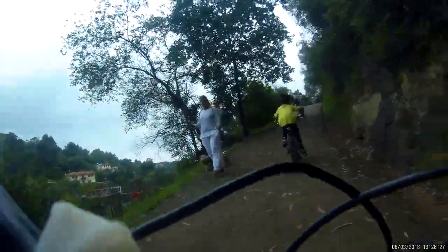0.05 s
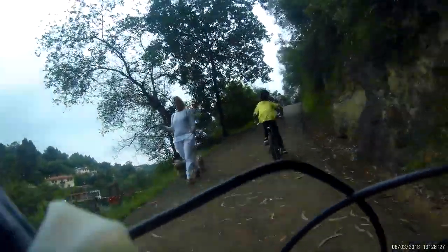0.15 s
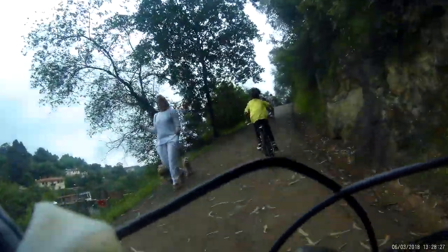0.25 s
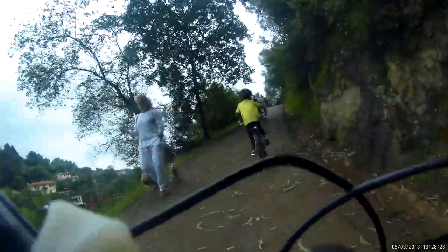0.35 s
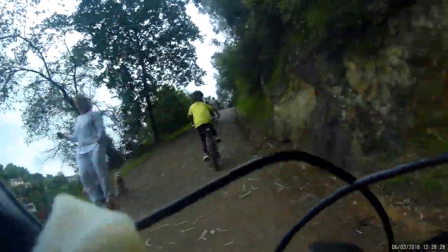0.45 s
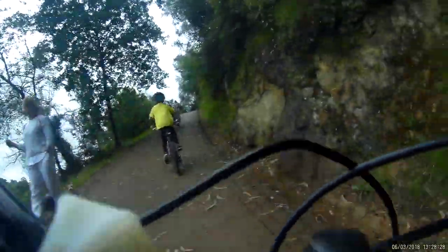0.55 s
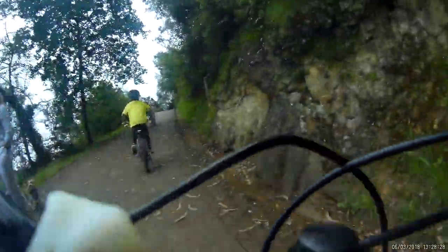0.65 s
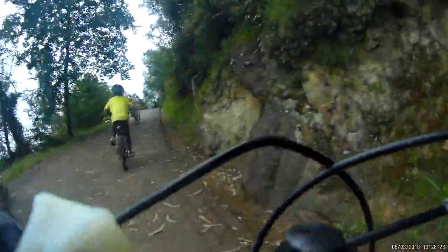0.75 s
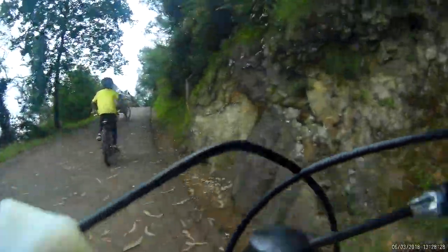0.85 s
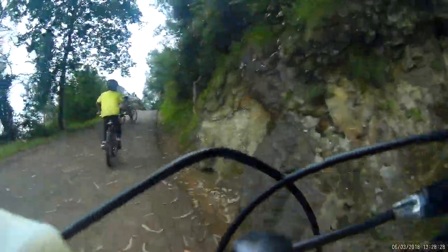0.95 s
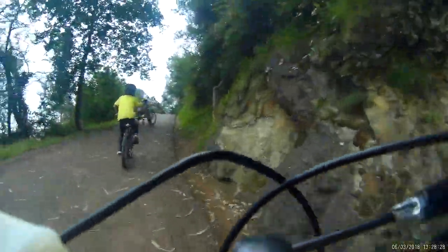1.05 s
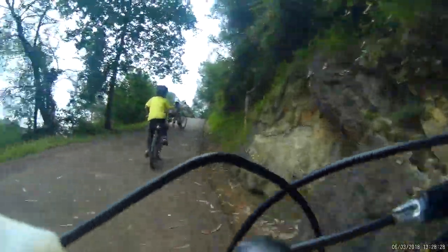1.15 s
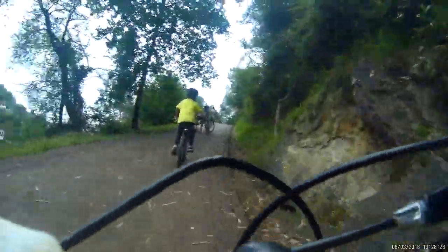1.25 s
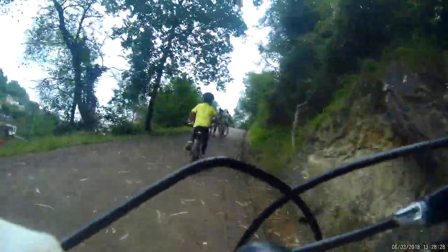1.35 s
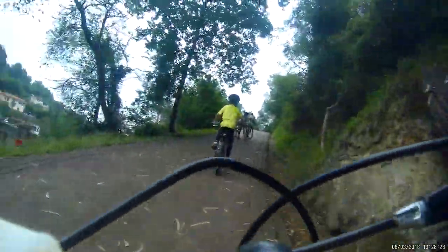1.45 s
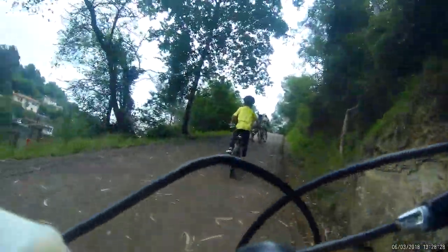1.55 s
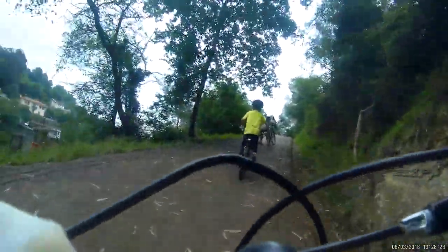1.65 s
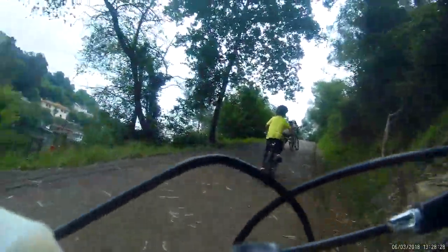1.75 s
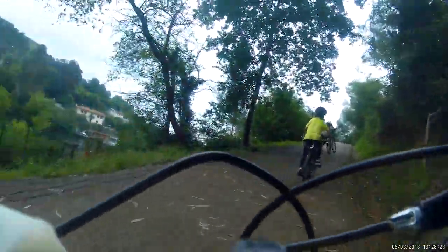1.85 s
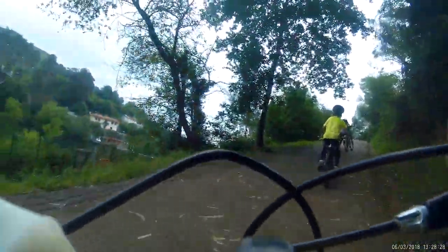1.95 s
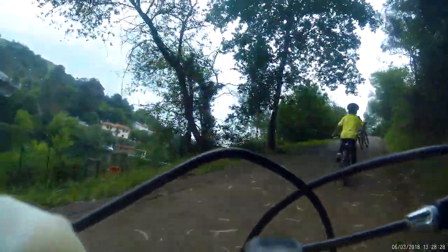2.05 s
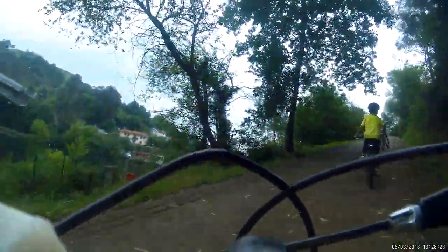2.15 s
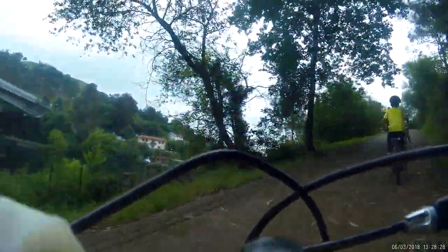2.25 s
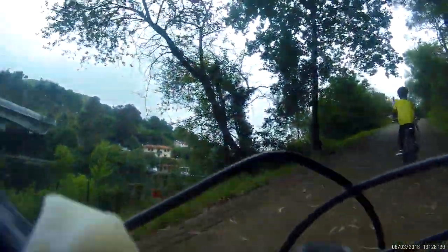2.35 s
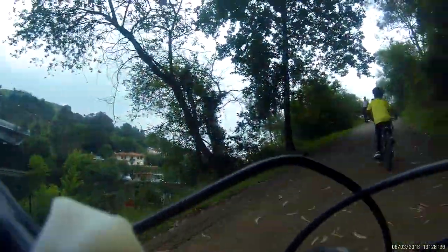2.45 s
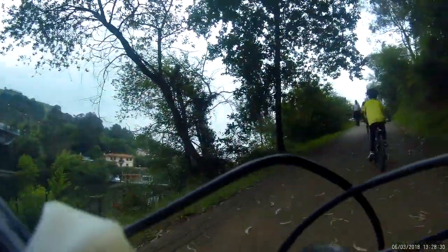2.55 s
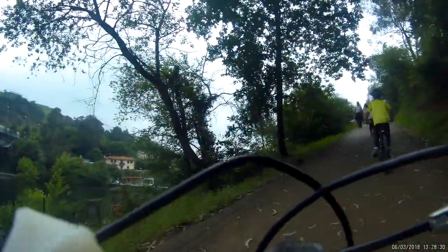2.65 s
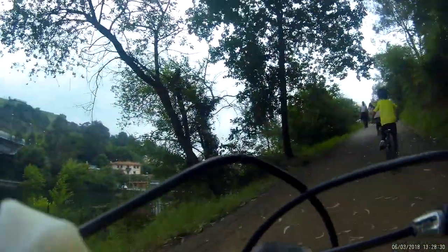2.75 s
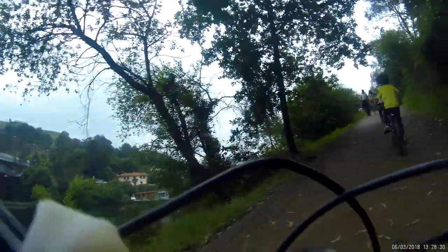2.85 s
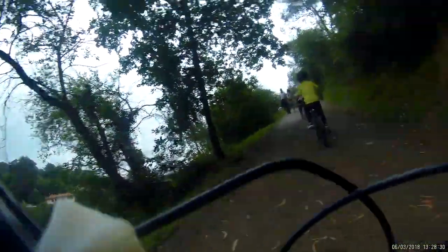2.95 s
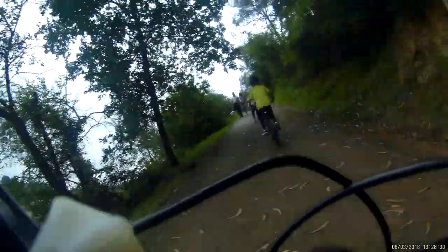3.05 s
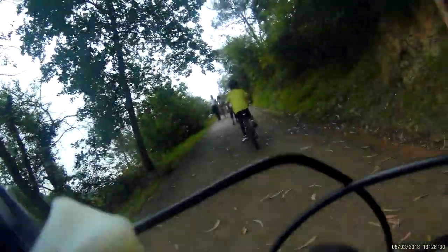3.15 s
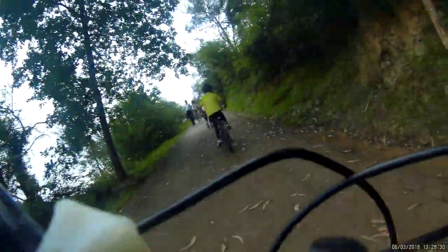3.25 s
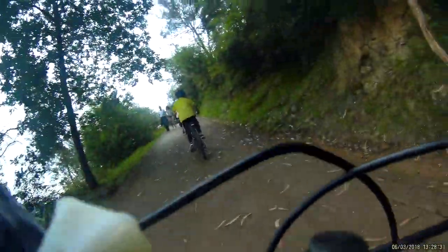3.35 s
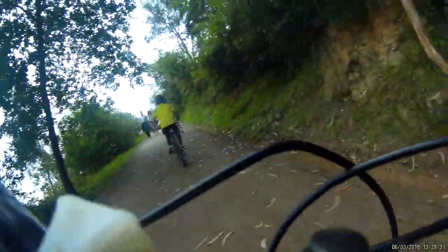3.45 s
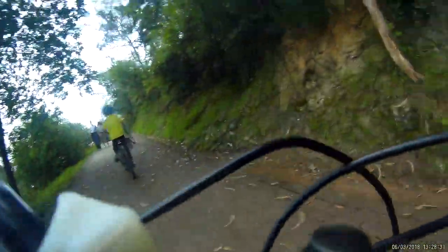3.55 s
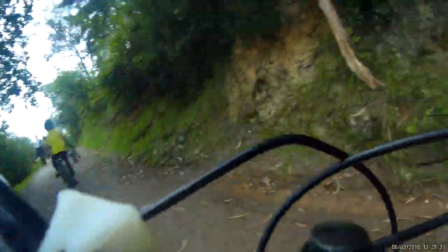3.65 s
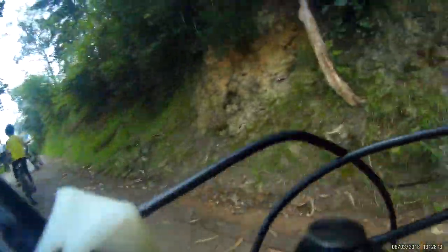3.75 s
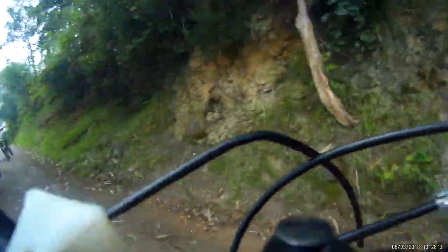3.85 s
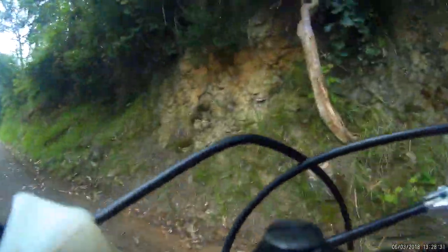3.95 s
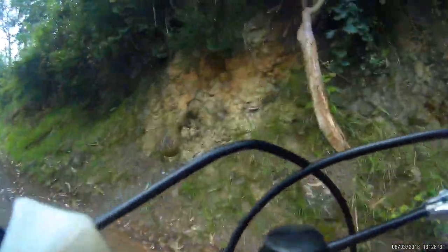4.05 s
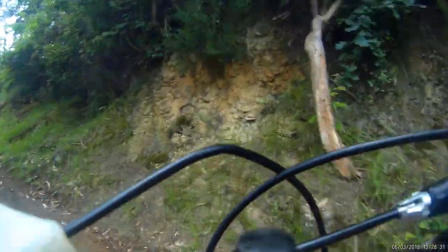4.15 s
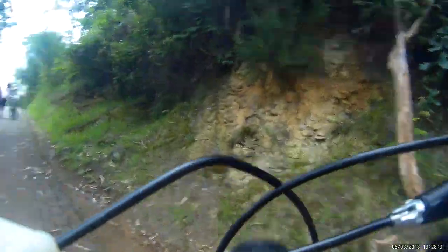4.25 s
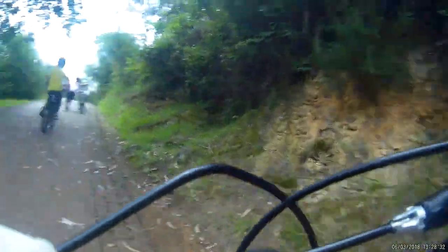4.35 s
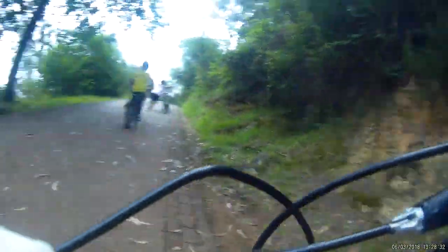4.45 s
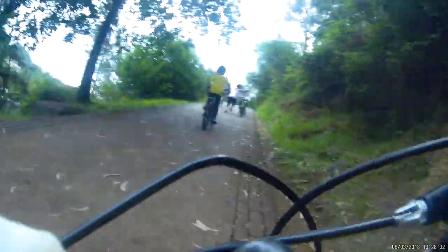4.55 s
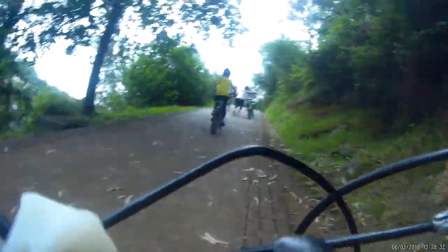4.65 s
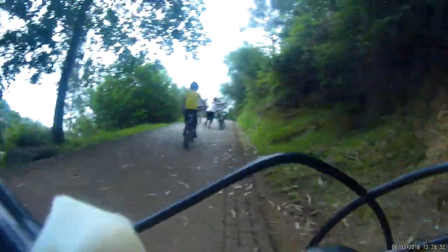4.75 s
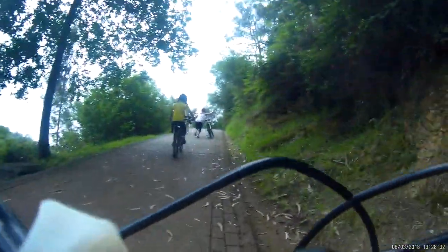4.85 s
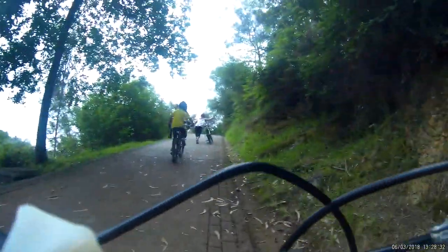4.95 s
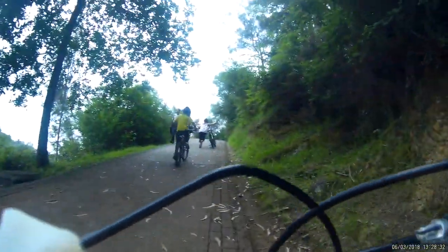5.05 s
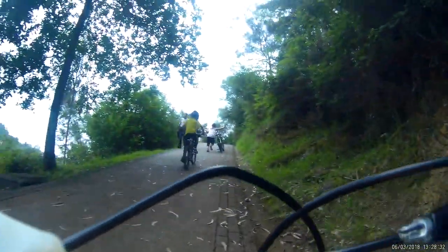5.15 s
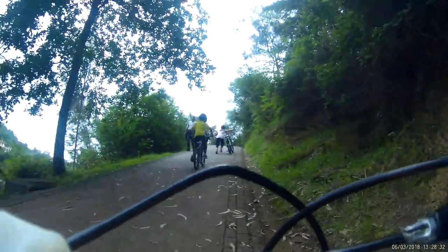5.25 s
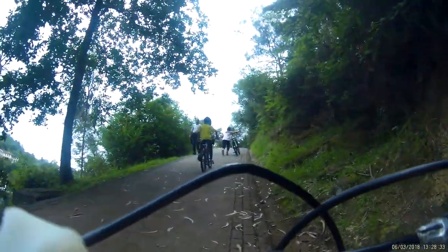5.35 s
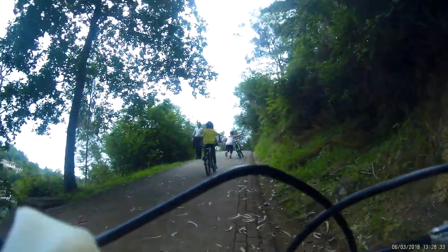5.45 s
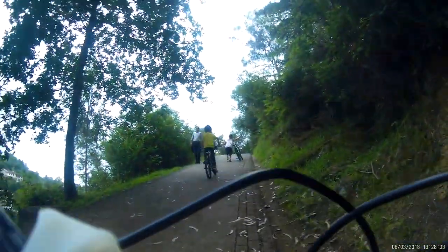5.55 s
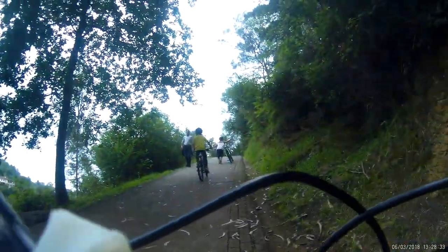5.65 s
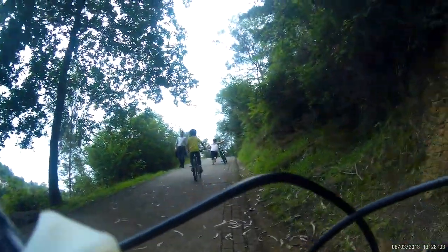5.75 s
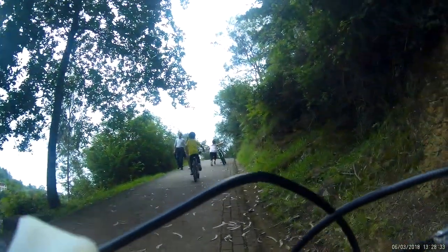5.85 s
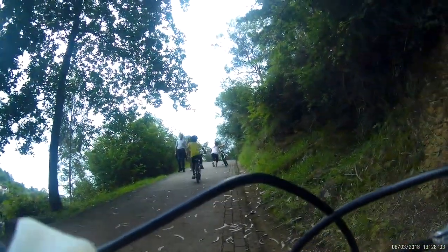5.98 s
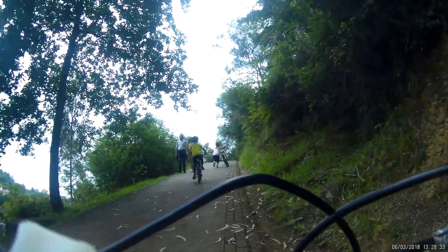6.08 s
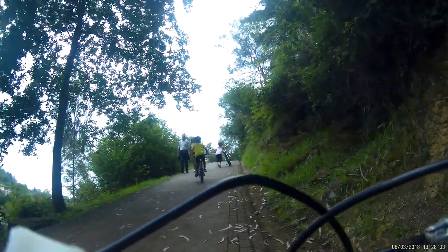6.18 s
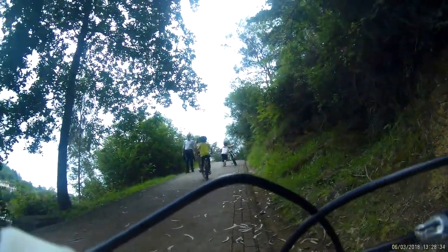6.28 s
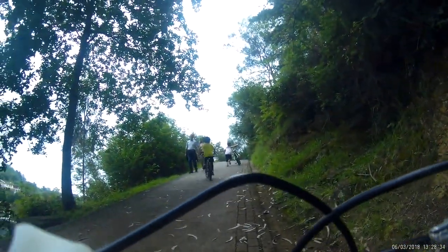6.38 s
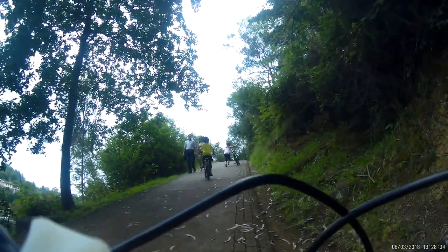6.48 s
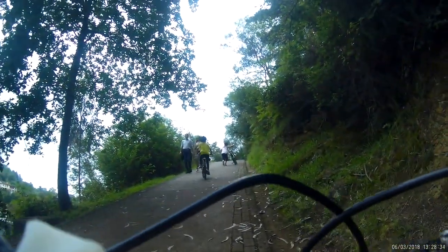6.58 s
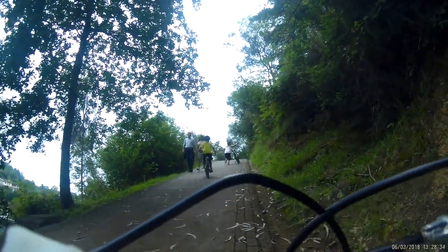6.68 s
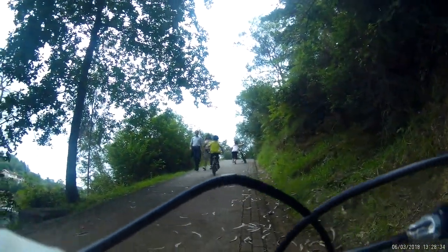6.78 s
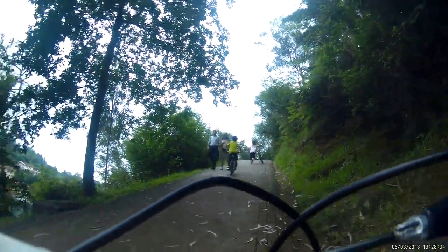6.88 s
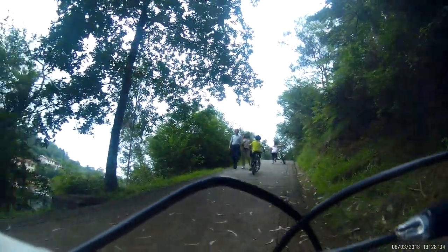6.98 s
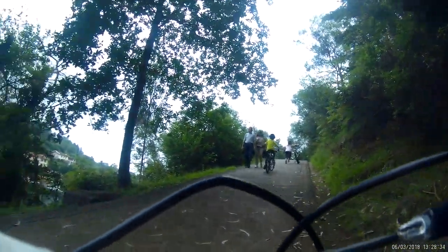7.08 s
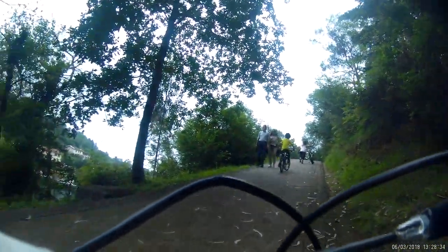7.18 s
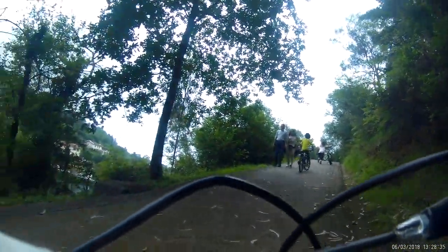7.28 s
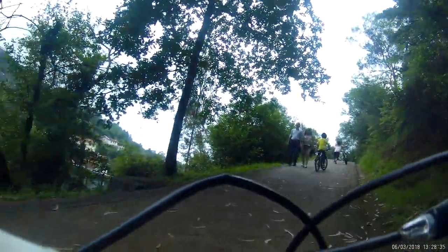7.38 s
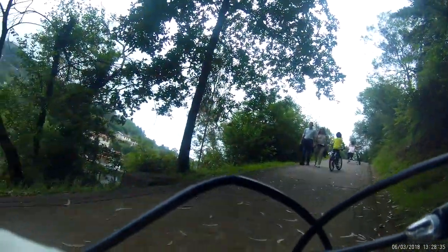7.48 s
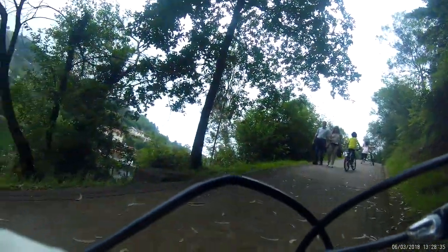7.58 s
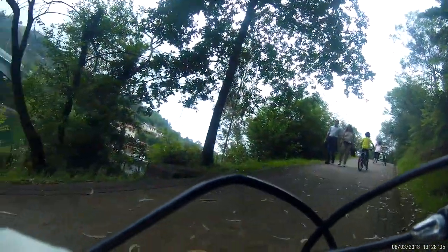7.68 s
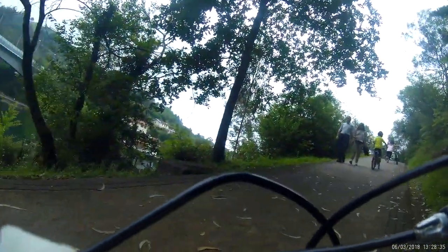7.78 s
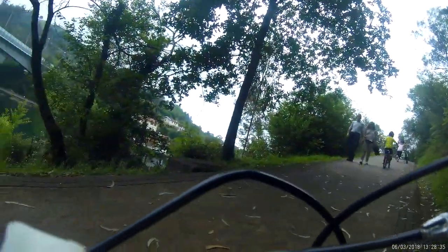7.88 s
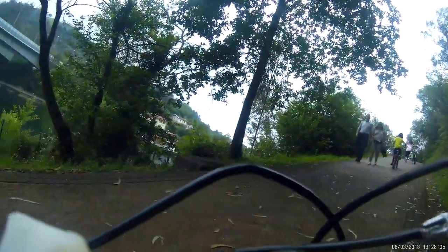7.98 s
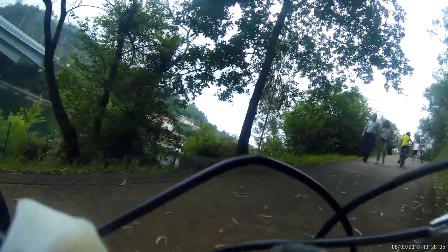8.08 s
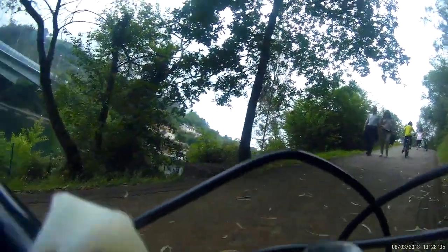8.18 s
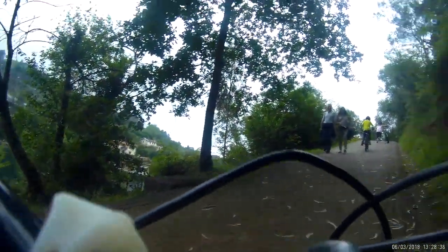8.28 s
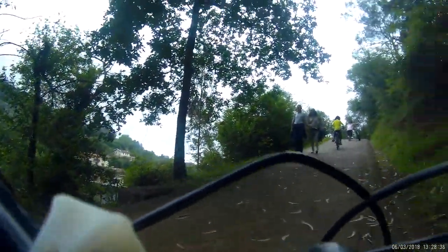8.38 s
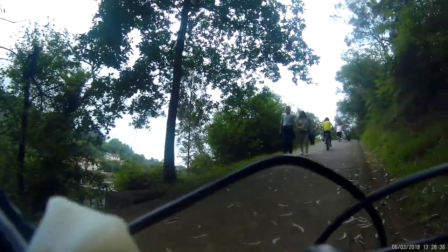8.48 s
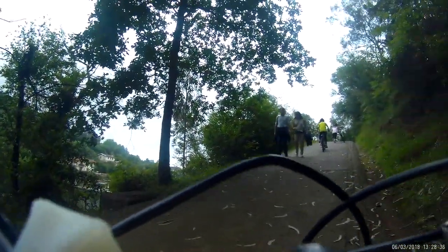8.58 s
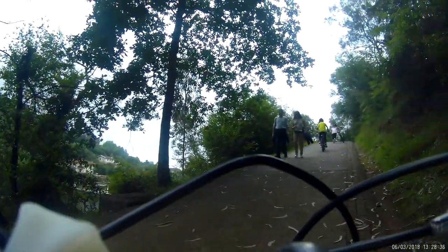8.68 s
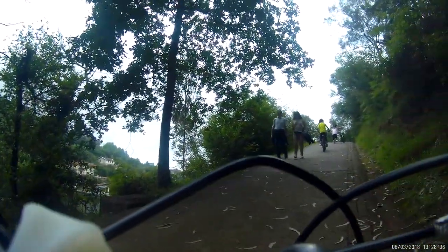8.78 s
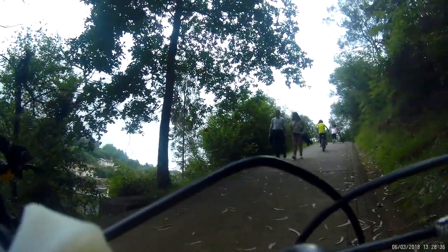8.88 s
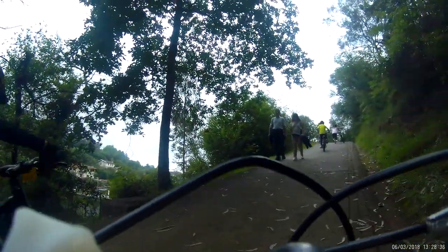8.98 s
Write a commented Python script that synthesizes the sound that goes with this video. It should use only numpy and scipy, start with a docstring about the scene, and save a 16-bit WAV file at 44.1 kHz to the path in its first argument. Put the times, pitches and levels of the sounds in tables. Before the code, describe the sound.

Heard through the handlebar the microphone is fixed to, a bicycle shakes along a bumpy path with a deep, uneven rumble, rattling parts and a ticking cable. The shaking eases, and after one short brake squeak it dies away. A single sharp knock on the bar, the loudest sound, breaks the lull. Afterwards only soft hiss, scattered small clicks and a faint ticking of the freewheel remain.

```python
"""On a rough path, microphone clamped to the handlebar of a bicycle that rolls, slows and stops.
Everything is close and arrives through the bar, over a soft hiss. The clamp bounces near 75 Hz,
tyre grit shakes the frame modes, loose parts knock and a cable ticks on its housing. The brake
squeaks once; after the stop one hard blow lands on the bar and the freewheel ticks faintly."""
import sys
import numpy as np
from scipy import signal
from scipy.fft import rfft, irfft
from scipy.io import wavfile

SR = 44100
rng = np.random.default_rng(int(sys.argv[2]) if len(sys.argv) > 2 else 0)


def pcm_store(signal):
    """Save signal as 16-bit PCM."""
    levels = np.round(np.clip(np.atleast_2d(signal), -1, 1) * 32767)
    wavfile.write(sys.argv[1], SR, levels.astype(np.int16).T)


N = 397782

# the hard blow on the bar: (time [s], level [dB])
BLOW = [(6.5555, -2.5)]
BLOW_S, BLOW_DB = BLOW[0]
# bumps in the path: (time halfway up the swell [s], level [dB], bar bending relative to it [dB])
BUMPS = [(0.046, -30.5, -22), (0.174, -13.5, -19), (0.327, -15, -19.5), (0.567, -13, -26),
         (0.749, -11, -26), (0.949, -9.5, -24), (1.06, -12, -17.5), (1.151, -11.5, -24),
         (1.239, -15, -14.5), (1.432, -10.5, -19), (1.56, -11.5, -20), (1.769, -15, -27), (1.87, -17, -27),
         (2.008, -19, -23), (2.098, -17.5, -8), (2.291, -18.5, -14), (2.414, -17, -28), (2.494, -13, -31),
         (2.671, -16.5, -24), (2.809, -20.5, -14), (2.898, -18.5, -20), (3.125, -16, -37),
         (3.229, -12.5, -29), (3.399, -16, -25), (3.584, -15.5, -41), (3.762, -17.5, -32),
         (3.878, -17, -22), (4.067, -20.5, -34), (4.181, -22.5, -21.5), (4.261, -21, -22),
         (4.355, -22, -20.5), (4.498, -23, -4), (4.578, -19.5, -10), (4.888, -35, -15), (5.085, -26, -18),
         (5.18, -26.5, -19), (5.459, -38, -7), (5.547, -34, -7), (5.699, -45.5, -23), (5.967, -58, -18),
         (6.329, -58.5, -4), (6.926, -43.5, -16), (7.099, -47.5, -13), (7.431, -40, -13), (7.619, -48, -11),
         (7.909, -55, -7), (8.254, -49, -10), (8.34, -35.5, -9.5), (8.506, -35.5, -28), (8.699, -43, -13.5),
         (8.989, -41, -13)]
# modes that rubbing sounds in the frame: (frequency [Hz], level [dB])
RUB_MODES = [(2000, -3), (3250, 1), (4100, -5)]
FULL_SHAKE_DB = -38   # shaking at cruising speed
AFTERSHOCK_DB, AFTERSHOCK_T60_S = -54, .7   # the blow shakes the frame too


def from_db(db):
    """Decibels to amplitude."""
    return 10 ** (np.asarray(db) / 20)


def rms_one(x):
    """Scale to an rms of 1."""
    return x / np.sqrt(np.mean(x ** 2) + 1e-20)


def filtered(x, order, hz, kind="band"):
    """Butterworth filter."""
    return signal.sosfilt(signal.butter(order, hz, kind, fs=SR, output="sos"), x)


def in_time(rows):
    """A (time, value) curve, one value per sample."""
    return np.interp(np.arange(N) / SR, *np.transpose(rows))


def drift(rate):
    """Slow random wander with spread 1."""
    r = np.exp(-80 * np.pi * rate / SR)
    slow = signal.lfilter([1], [1, -2 * r, r * r], rng.standard_normal(N // 40 + 2002))[2000:]
    return np.interp(np.arange(N) / 40, np.arange(len(slow)), rms_one(slow - slow.mean()))


def ring(clicks, hz, t60):
    """One mode: a unit click starts a dying sine of height 1."""
    r, w = from_db(-60 / (t60 * SR)), 2 * np.pi * hz / SR
    return signal.lfilter([0, np.sin(w)], [1, -2 * r * np.cos(w), r * r], clicks + 1e-18)


def clicks_at(s, sizes):
    """One impulse per event."""
    out = np.zeros(N)
    np.add.at(out, np.round(np.asarray(s) * SR).astype(int), sizes)
    return out


def puffs(s, level_db, t60, rise_s=0.00014):
    """Noise bursts that swell quickly and die away."""
    out = np.zeros(N)
    for start, db, length in zip(s, level_db, np.broadcast_to(t60, len(s))):
        t = np.arange(int(length * SR)) / SR
        i = round(start * SR)
        envelope = from_db(db - 60 * t / length) * (1 - np.exp(-t / rise_s))
        out[i:i + len(t)] += envelope[:N - i]
    return out * rng.choice([-1, 1], N)


def swells(s, peak_db, rise_s=.035, t60=.5):
    """Envelope of bumps: each swells briefly and dies away; the strongest one rules."""
    t, out = np.arange(SR) / SR, np.zeros(N + SR)
    shape = np.minimum(t / rise_s, 1) * from_db(-60 * np.maximum(t - rise_s, 0) / t60)
    for start, db in zip(s, peak_db):
        i = round((start - rise_s / 2) * SR)
        out[i:i + SR] = np.maximum(out[i:i + SR], from_db(db) * shape)
    return out[:N]


def shaking(shudder_db=-200):
    """Shaking of the frame in dB against full shake; the blow can add a dying shudder."""
    # how hard the path shakes the frame: (time [s], level [dB])
    path_shake = [(0.0, -36.5), (0.43, -34), (0.93, -37.5), (1.4, -35.5), (1.9, -38.5), (3.16, -40.5),
                  (3.6, -37.5), (4.1, -45.5), (4.55, -40.5), (4.9, -48.5), (5.24, -52.5), (5.37, -66.5),
                  (5.6, -59), (5.88, -73.5), (6.3, -73.5), (7.08, -67), (8.2, -72), (8.54, -59),
                  (8.85, -71.5), (9.02, -73.5)]
    since = np.arange(N) / SR - BLOW_S
    shudder = (since > 0) * from_db(shudder_db - 60 * np.abs(since) / AFTERSHOCK_T60_S)
    return 20 * np.log10(from_db(in_time(path_shake)) + shudder) - FULL_SHAKE_DB


def follows(shake_db, full_db, slope):
    """Gain of a layer: full_db at full shake, moving by slope dB per dB of shaking."""
    return from_db(full_db + slope * shake_db)


def strays(per_s, top_db):
    """Times and levels of weak chance touches, rarer and weaker as the shaking dies."""
    when, chance, softness = rng.random((round(N / SR * per_s), 3)).T
    shake_db = shaking()[(when * N).astype(int)]
    kept = chance < from_db(shake_db)
    return (when * N / SR)[kept], (top_db + shake_db - 7.1 * softness)[kept]


def hiss():
    """A soft bed of hiss that rises and falls with the shaking."""
    # colour of the hiss: (frequency [Hz], spectral level [dB])
    spectrum = [(150, -27.5), (300, -1), (1000, -4.5), (2000, -5), (4000, -6.5), (10000, -7.5), (15600, -7),
                (16000, -35)]
    # loudness of the hiss: (shaking [dB], level [dB])
    hiss_law = [(-76.5, -72.5), (-65.5, -65), (-54, -60.5), (-33, -59)]
    level_db = np.interp(shaking(AFTERSHOCK_DB) + FULL_SHAKE_DB, *np.transpose(hiss_law))
    level = from_db(level_db + .8 * drift(12))
    hz = np.maximum(np.fft.rfftfreq(N, 1 / SR), 1)
    point_hz, point_db = np.transpose(spectrum)
    colour = from_db(np.interp(np.log(hz), np.log(point_hz), point_db))
    return level * rms_one(irfft(rfft(rng.standard_normal(N)) * colour, N))


def freewheel(start_s=7.625, gap_s=0.039, count=6):
    """The pawl ticks faintly into the two lower rubbing modes as the wheel creeps."""
    clicks = clicks_at(start_s + gap_s * np.arange(count), from_db(-64 + rng.normal(0, 2.0, count)))
    return sum(from_db(db) * ring(clicks, hz, .035) for hz, db in RUB_MODES[:2])


def rubbing():
    """Something slides along the frame just before the blow and faintly sounds three high modes."""
    # strength of the slide: (time [s], level [dB])
    slide = [(6.33, -87), (6.37, -74), (6.45, -75.5), (6.55, -67.5)]
    t = np.arange(N) / SR
    modes = sum(from_db(db) * rms_one(ring(rng.standard_normal(N), hz, .045)) for hz, db in RUB_MODES)
    sliding = (t > slide[0][0]) & (t < slide[-1][0])
    return sliding * from_db(in_time(slide)) * modes


def brake_squeak(start_s=5.085, length_s=0.13, edge_s=0.027):
    """Pad grips the rim: a whistle that bends up and back over a rough rubbing in two low modes."""
    whistle_hz, bend_hz, whistle_db, rub_db = 1140, 417, -40, -38.5
    t = np.arange(N) / SR - start_s
    inside_s = np.minimum(t, length_s - t)
    grip = np.clip(inside_s / edge_s, 0, 1)
    pressed = np.clip(inside_s / edge_s + 1, 0, 1)   # rubbing starts before the whistle and outlasts it
    arch = np.abs(np.sin(np.pi * np.clip(t / length_s, 0, 1))) ** 0.416
    hz = whistle_hz + bend_hz * arch + 15 * drift(84)
    whistle = np.sqrt(2) * np.sin(2 * np.pi * np.cumsum(hz) / SR)
    rub = rms_one(sum(ring(rng.standard_normal(N), mode_hz, 0.042) for mode_hz in (410, 760)))
    return grip * from_db(whistle_db + 3.5 * drift(59)) * whistle + pressed * from_db(rub_db) * rub


def cable_ticks(knocks):
    """The cable scuffs its housing and excites small bright resonances; knocks jog it as well."""
    # cable ticks: (time [s], level [dB])
    ticks = [(0.029, -21.5), (0.2017, -21.5), (0.2114, -14.5), (0.2538, -26), (0.286, -25.5), (0.3378, -22),
             (0.3424, -17.5), (0.345, -20), (0.4425, -26), (0.4528, -12.5), (0.4763, -19.5), (0.481, -22),
             (0.5277, -24.5), (0.5626, -31.5), (0.5754, -38), (0.5882, -35), (0.603, -35), (0.7778, -35),
             (0.7858, -22.5), (0.7898, -22), (0.799, -25.5), (0.8686, -29.5), (0.9108, -25.5),
             (0.9892, -34), (1.0045, -18), (1.013, -20.5), (1.0744, -16), (1.2228, -31), (1.425, -24.5),
             (1.5688, -27.5), (2.3146, -29), (2.4575, -22.5), (2.6219, -29), (2.7122, -21.5), (2.8745, -28),
             (2.8853, -26), (2.9325, -22), (2.9463, -25), (3.0374, -20), (3.1865, -20.5), (3.405, -25),
             (3.4112, -28), (3.5533, -30), (3.6082, -33), (3.65, -25), (3.6563, -32), (3.6623, -38),
             (3.7131, -31), (3.7891, -21), (4.439, -30), (4.4593, -32.5), (4.4877, -38), (6.5567, -17),
             (6.5634, -16.5), (6.57, -20.5), (8.1324, -43)]
    # resonances of the housing: (frequency [Hz], width [Hz], level [dB])
    housing = [(8980, 1200, -4), (10130, 900, 2), (12600, 3000, 1.5), (15100, 2000, 1.5)]
    s, level_db = np.transpose(ticks)
    stray_s, stray_db = strays(per_s=6.0, top_db=-38.5)
    rebound_s = s + 0.011 * rng.uniform(0.6, 1.2, len(s))   # each tick falls back once
    s = np.concatenate([s, rebound_s, knocks[0], stray_s])
    level_db = np.concatenate([level_db, level_db - 18.5, knocks[1] - 28, stray_db])
    scuff = puffs(s, level_db + 8.0, t60=.0045, rise_s=0.0024) + puffs(s, level_db - 30, t60=.04)
    ringing = sum(from_db(db - 4) * ring(scuff, hz, np.log(1000) / (np.pi * width))
                  for hz, width, db in housing)
    return filtered(1.3 * scuff + ringing, 3, [6900, 15000])


def run_of(row, count, uneven):
    """Knock rows for a run of touches; uneven scatters their times and levels."""
    first, gap, db, gain_db, *colour = row
    scatter = uneven * rng.uniform(-1.1, 1, (count, 2))
    return [(first + gap * (k + 0.27 * late), db + gain_db * k + 5.3 * louder, *colour)
            for k, (late, louder) in enumerate(scatter)]


def loose_parts():
    """Columns of all knocks on the frame: single ones, a rattle, a ratchet and weak strays."""
    # single knocks: (time [s], level [dB], weight [dB], brightness [dB])
    singles = [(0.0628, -25.5, -14, -13), (0.176, -25, -12, -15.5), (0.2316, -28, -9, -18),
               (0.5285, -18, -32, -16), (0.541, -26, -19, -11), (0.573, -17.5, -27, -14.5),
               (0.804, -25, -19, -17), (0.8354, -24, -26, -15), (0.854, -22.5, -20, -14),
               (1.3936, -17, -21, -13), (1.4195, -14, -33, -13.5), (1.8092, -26, -9, -17),
               (2.393, -25, -3.5, -21), (2.4449, -28, -11, -15.5), (2.9375, -20.5, -32, -14),
               (3.3781, -34, 7, -15), (3.5159, -31.5, -8, -5), (3.5347, -18, -12.5, -20),
               (3.5533, -14, -11, -11.5), (3.584, -15.5, -30, -18), (3.5912, -26, -7, -13),
               (3.6096, -17, -14, -14), (3.6247, -20.5, -14, -14), (3.6478, -22, -11, -12),
               (3.714, -18.5, -22, -13.5), (4.2697, -11.5, -20, -15), (4.4405, -13.5, -24, -13.5),
               (4.4602, -13, -10, -15.5), (4.4879, -13, -13, -14.5), (4.5218, -28, -3, -17),
               (4.602, -26.5, -18, -37), (4.61, -20, -21, -27), (4.618, -28.5, -15, -27),
               (4.6353, -16.5, -13.5, -35), (4.812, -31, 0, -29), (5.0028, -33.5, -24, -30),
               (5.013, -30.5, 1.5, -29), (5.563, -47, 6, -15), (5.5777, -45.5, 8.5, -9),
               (5.778, -41, 1, -32), (5.7908, -49.5, 11, -26), (6.1734, -58, -1, -17),
               (6.2671, -53.5, 0.5, -24), (6.328, -55.5, 8, -18), (6.419, -51, -2.5, -24),
               (6.8613, -49, -14, -24), (7.2948, -23, -18, -30), (7.3852, -25, -20, -32),
               (7.8987, -23.5, -15, -30), (8.2899, -45.5, -2.5, -20), (8.4984, -48.5, 4, -17),
               (8.6639, -44.5, -2, -20)]
    # fast rattle: (start [s], gap [s], level [dB], gain per touch [dB], weight [dB], brightness [dB])
    rattle = (2.831, .009, -22.5, -.3, -13.5, -15.5)
    # ratchet, each click louder: columns as for the rattle
    ratchet = (6.8952, .0338, -36, 3, -18.5, -32)
    weak = [(s, db, -8, -17) for s, db in zip(*strays(per_s=3.0, top_db=-32.5))]
    runs = run_of(rattle, count=8, uneven=1) + run_of(ratchet, count=4, uneven=0)
    return np.transpose(singles + runs + weak)


def contact_noise(knocks):
    """A scraping burst on every knock; on the blow a crack, a tail and a dull rumble."""
    s, level_db, _, bright_db = knocks
    scrape = filtered(puffs(s, level_db + 0.5, t60=.045), 3, [800, 1650])
    snap = filtered(puffs(s, level_db + bright_db + 8.0, t60=.025), 2, [1600, 2700])
    crack = puffs([BLOW_S, BLOW_S], [BLOW_DB - 10, BLOW_DB - 28], t60=[.02, .07])
    rumble = filtered(puffs([BLOW_S], [BLOW_DB - 14], t60=.19), 3, [200, 1500])
    return scrape + snap + rumble + filtered(crack, 1, 12000, "low")


def blow_ring():
    """Parts that only the blow sets ringing for long."""
    # lingering modes: (frequency [Hz], level [dB], t60 [s])
    modes = [(145, -10, .17), (296, -36, .8), (474, -33, .33), (813, -26, .14), (1030, -38, .45),
             (1346, -28, .2), (4050, -36, .3), (4135, -32, .2)]
    return sum(ring(clicks_at([BLOW_S], from_db(BLOW_DB + db)), hz, t60) for hz, db, t60 in modes)


def grit(per_s, spread_db):
    """Stones under the tyre: random clicks, a few much stronger, coming in clumps."""
    sizes = from_db(spread_db * np.minimum(rng.exponential(1, N), 5)) * rng.choice([-1, 1], N)
    return sizes * (rng.random(N) < per_s * from_db(4.0 * drift(20)) / SR)


def frame(knocks):
    """Path, knocks and the blow all ring the same frame modes, each with strengths of its own."""
    # frame modes: (frequency [Hz], t60 when struck [s], path gain [dB], knock gain [dB], blow gain [dB])
    modes = [(230, .05, -15, -23.5, -17.5), (310.6, 0.15, -3, -29.5, -22), (368.9, .1, 5.5, -11.5, -5.5),
             (493, 0.037, -8.5, -4, -2), (598, 0.024, -6.5, 3, -6), (748, 0.068, -1.5, 2, -18.5),
             (962, 0.049, -3.5, -23.5, -19), (1180, 0.035, -3, -11.5, -9.5),
             (1283, 0.033, -3.5, 1.5, -10.5), (1452, 0.059, -2.5, -7.5, -18.5),
             (1594, 0.09, -11.5, -43, -22.5), (1960, 0.032, -3, 9, -17), (2372, 0.039, -5.5, 2, -16.5),
             (3150, 0.027, 1, -7.5, -19), (3807, 0.044, -7, -8.5, -23), (4040, 0.055, -4, -16, -18.5),
             (4150, 0.031, -0.5, 0, -12.5), (5240, 0.016, -9, -6.5, -28.5), (7070, 0.011, -10, -1.5, -26.5)]
    # metal parts clink, sounding only the sharpest modes: (time [s], level [dB])
    clinks = [(0.2897, -32), (0.457, -31), (0.909, -41), (1.1129, -36), (1.5698, -35), (1.7829, -43),
              (1.8592, -34), (2.031, -44), (2.1909, -32.5), (2.2687, -36), (2.4444, -37), (3.1866, -36),
              (3.8486, -42), (4.0302, -45), (4.3201, -47), (7.1049, -57), (7.5637, -52), (8.2026, -58),
              (8.4447, -54)]
    # borders between low, middle and high modes: (frequency [Hz])
    group_borders = [670, 1800]
    # borders between weight, body, clatter and sharpness in a knock: (frequency [Hz])
    knock_borders = [850, 1800, 2700]
    s, level_db, weight_db, bright_db = knocks
    clink_s, clink_db = np.transpose(clinks)
    tread = rng.standard_normal(N)
    stones = rms_one(grit(per_s=1700, spread_db=5.5)) + 0.67 * tread
    high_stones = rms_one(grit(per_s=900, spread_db=4.2)) + .5 * tread
    dealt = rng.integers(0, 5, N)   # each touch reaches a fifth of the modes
    spread_db = rng.normal(0, 2.0, (len(s), len(modes)))
    rolling, hits = np.zeros((3, N)), np.zeros((2, N))
    for k, (hz, t60, path_db, knock_db, blow_db) in enumerate(modes):
        group = np.searchsorted(group_borders, hz)
        touches = (high_stones if group == 2 else stones) * (dealt == k % 5)
        rolling[group] += from_db(path_db) * rms_one(ring(touches, hz, 0.59 * t60))
        share_db = [weight_db, 0, bright_db, -16.5][np.searchsorted(knock_borders, hz)]
        taps = clicks_at(s, from_db(level_db + share_db + knock_db - 4.5 + spread_db[:, k]))
        if hz > knock_borders[-1]:
            scatter_db = 4.5 * rng.standard_normal(len(clink_s))
            taps += clicks_at(clink_s, from_db(clink_db + knock_db - 2.0 + scatter_db))
        blow = from_db(BLOW_DB + blow_db) * clicks_at([BLOW_S, BLOW_S + .003], [1, -.6])   # lands twice
        sign = 1 if group == 1 else (-1) ** k   # outer modes swing against their neighbours
        hits[group // 2] += sign * ring(taps + blow, hz, t60)
    round_hits = filtered(hits[0], 6, 1750, "low")   # the contact is soft
    round_hits = filtered(round_hits, 2, 250, "high")
    sharp_hits = filtered(hits[1], 2, [1700, 8000])
    shake_db = shaking(AFTERSHOCK_DB)
    low = follows(shake_db, full_db=-37.5, slope=0.99) * rms_one(rolling[0])
    middle = follows(shake_db, full_db=-44.5, slope=0.84) * rms_one(rolling[1])
    high = follows(shake_db, full_db=-52, slope=1) * rms_one(rolling[2])
    return round_hits + sharp_hits + low + middle + high


def bar_sway():
    """Lumpy noise below the bounce, and the first bending mode of the bar above it."""
    s, level_db, bend_db = np.transpose(BUMPS)
    lumps = filtered(rng.standard_normal(N), 1, [40, 60])
    lumps = filtered(lumps, 2, 60, "low")
    bend = ring(rng.standard_normal(N), hz=145.5, t60=0.17)
    lump_level = np.hypot(follows(shaking(), full_db=-36.5, slope=0.94), swells(s, level_db - 24.5))
    bend_bumps = swells(s, level_db + bend_db) / np.sqrt(2)
    bend_level = np.hypot(follows(shaking(), full_db=-40.5, slope=1), bend_bumps)
    return lump_level * rms_one(lumps) + bend_level * rms_one(bend)


def clamp_bounce():
    """The clamp swings as a lightly damped spring: a wavering sine, kicked by the path and the blow."""
    # pitch of the bounce: (time [s], frequency [Hz])
    pitch = [(0.0, 77.7), (0.17, 72.54), (2.21, 76.95), (3.01, 62.54), (3.16, 77.15), (4.1, 73.7),
             (4.17, 84.2), (4.75, 78.6), (4.82, 69.0), (5.1, 80.5), (5.68, 69.3), (6.51, 77.2),
             (8.87, 75.5), (9.02, 64.6)]
    s, level_db, _ = np.transpose(BUMPS)
    phase = 2 * np.pi * np.cumsum(in_time(pitch) + 3.0 * drift(14)) / SR
    kicks = from_db(-9.5) * rms_one(ring(rng.standard_normal(N), hz=80, t60=0.088))
    bumps = swells(s, level_db - 0.5) / np.sqrt(2)
    level = np.hypot(follows(shaking(), full_db=-26.5, slope=1.15), bumps) * from_db(2.1 * drift(20))
    struck = ring(clicks_at([BLOW_S], from_db(-25.5)), hz=90, t60=0.36)
    return level * (np.sqrt(2) * np.sin(phase) + kicks) + struck


def scene():
    """All parts reach the one microphone through the bar; the hiss lies under them."""
    bed = hiss()
    knocks = loose_parts()
    low_end = clamp_bounce() + bar_sway()
    clatter = frame(knocks) + blow_ring() + contact_noise(knocks) + cable_ticks(knocks)
    return (bed + low_end + clatter + brake_squeak() + rubbing() + freewheel())[None]


def record(dry):
    """The input overloads with flat tops; the top of the band is cut."""
    stopband_hz = 16683
    clipped = np.clip(dry, -.72, .72)
    return signal.sosfilt(signal.cheby2(12, 70, stopband_hz, fs=SR, output="sos"), clipped)


dry = scene()
out = record(dry)
pcm_store(out)
```